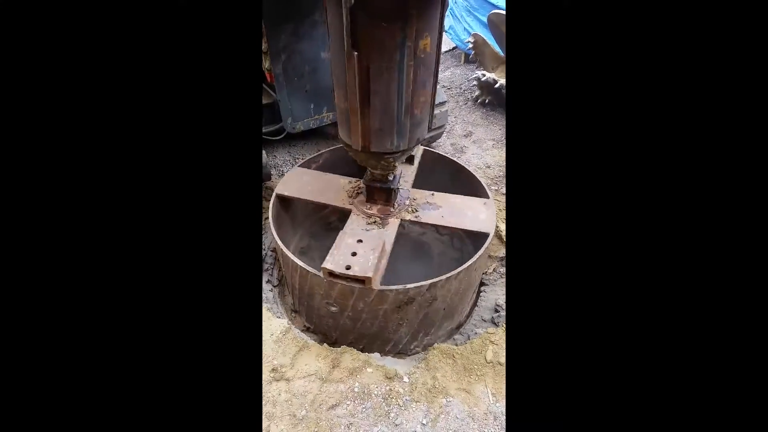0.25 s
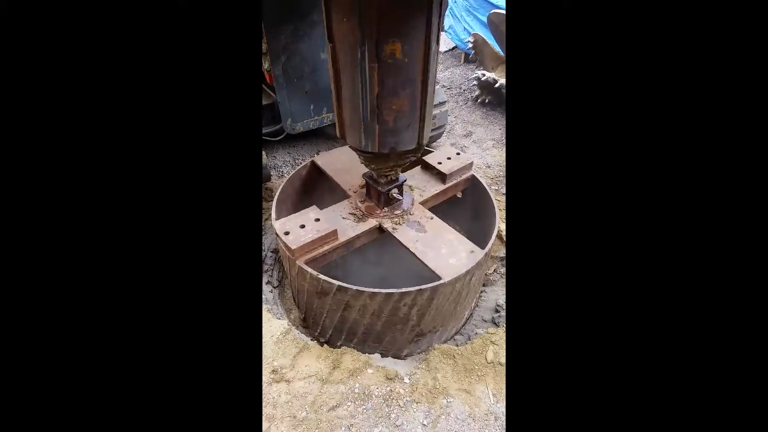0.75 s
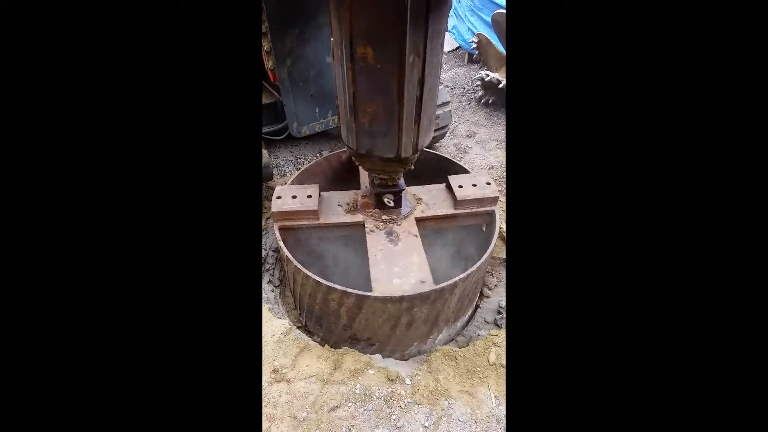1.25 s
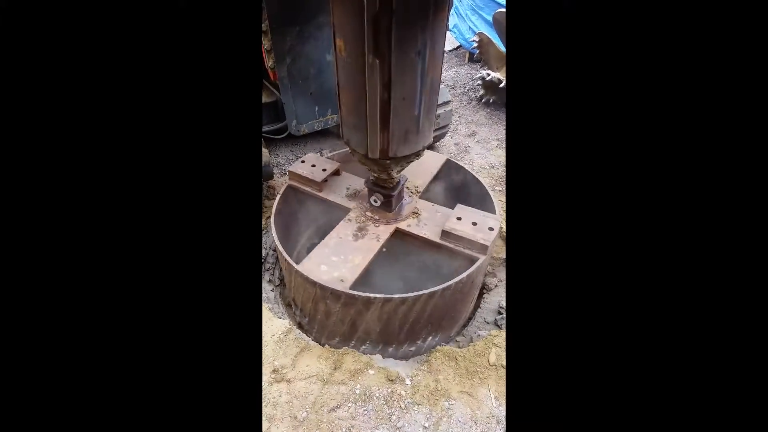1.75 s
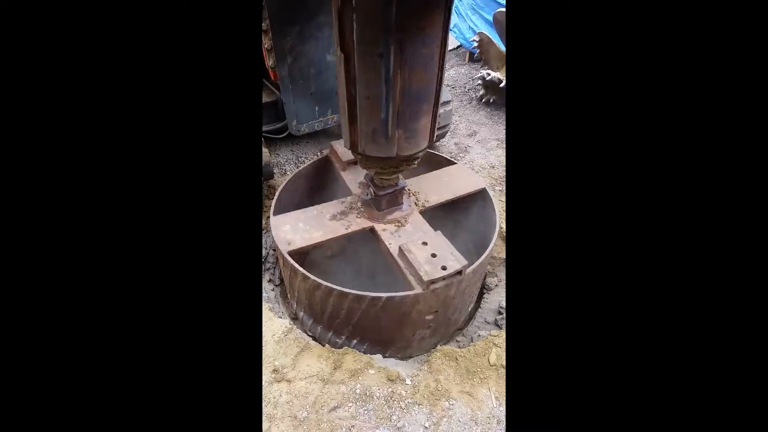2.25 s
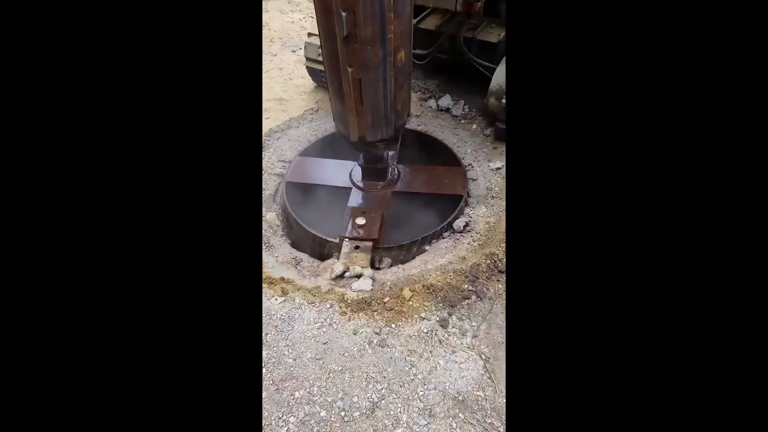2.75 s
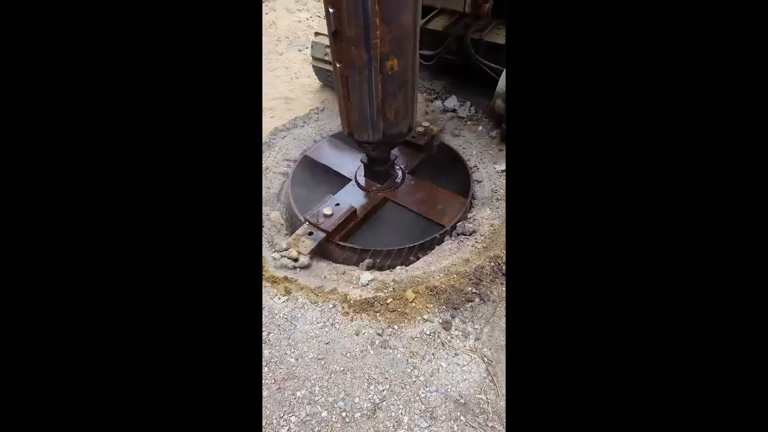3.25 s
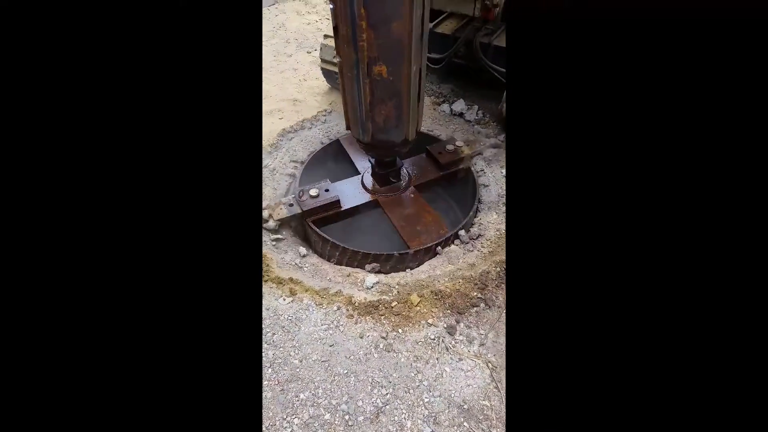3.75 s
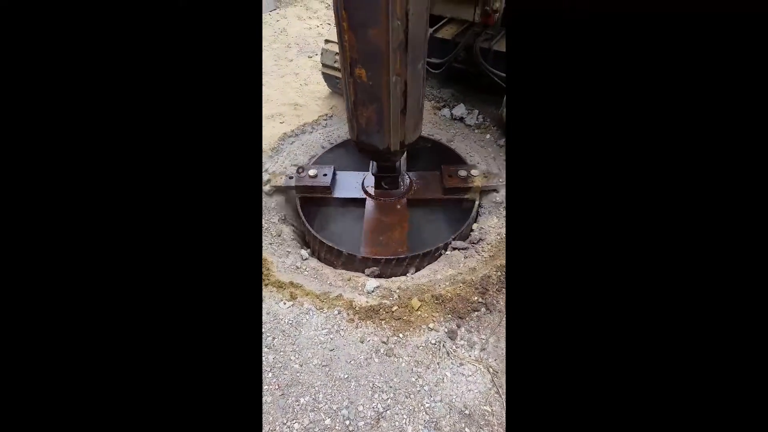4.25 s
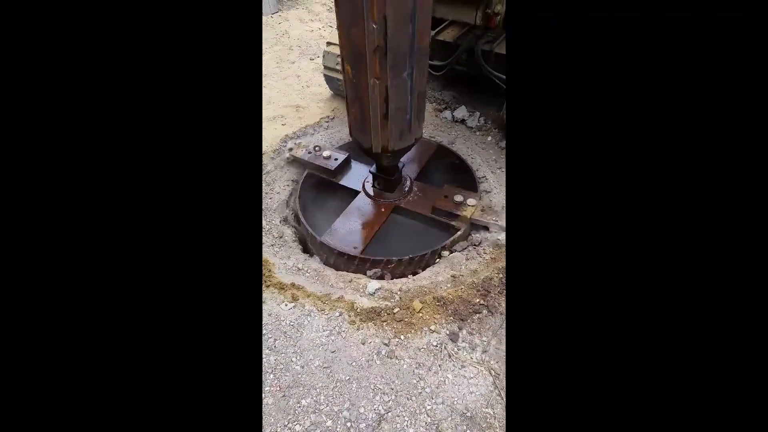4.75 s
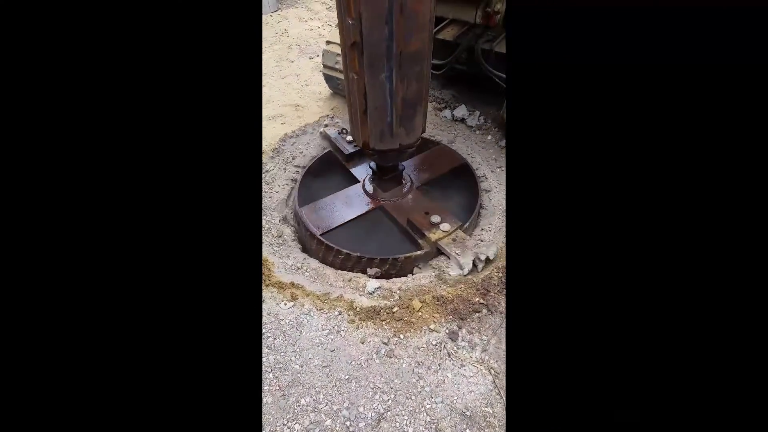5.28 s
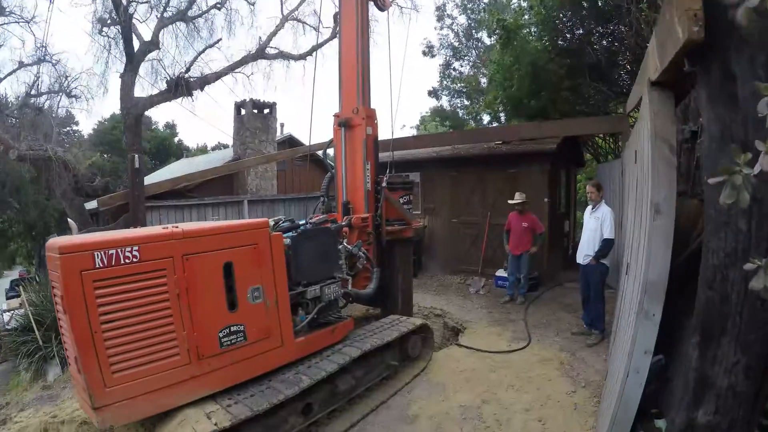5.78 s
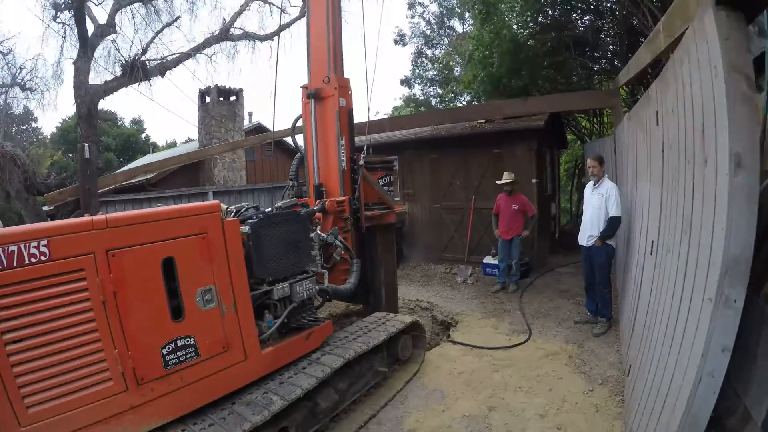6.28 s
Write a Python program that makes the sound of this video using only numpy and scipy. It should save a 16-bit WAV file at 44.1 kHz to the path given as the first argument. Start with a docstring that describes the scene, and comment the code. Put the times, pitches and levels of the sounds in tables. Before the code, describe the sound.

From 0 to 2.5 seconds, a close, loud, continuous grinding of steel teeth on rock: low rumble, gravelly crunch, bright scrape and fine sizzling grit. A diesel throbs near fifty pulses a second, sagging around 1.3 and 2.3, with a wavering drive hum. Hard spots surge, notably near 0.95, 1.25 and 1.67, with squeaks and thin squeals. A dry click marks the cut at 2.5. Until 5.4 the engine is slower and the barrel drags, catching in irregular booming bites and short groans, strong around 2.8, 3.6 and 4.1, sparser after 4.5, renewed at 5.2. Chips snap between them. Another click and a tiny gap precede 5.5, when a far quieter, steady diesel clatters and rattles beside the rig. Light knocks come near 5.8 and 6.25, a sharp double tick at 6.34, and low breeze rumble rises from 6.1 until the end at 6.5.

```python
"""Steel teeth of a core barrel cut hard rock: trains of tiny fractures, filtered by the barrel's modes.
A diesel engine drives the rig: sine orders of its firing rate. Three stretches follow one another.
First the teeth grind while the engine labours; then it runs slower and the teeth catch and break through
in single bites that boom in the barrel; last, beside the rig, the engine clatters in a breeze."""
import sys
import numpy as np
from scipy import signal
from scipy.fft import rfft, irfft
from scipy.io import wavfile
from scipy.ndimage import uniform_filter1d

SR = 44100
rng = np.random.default_rng(int(sys.argv[2]) if len(sys.argv) > 2 else 0)


def file_out(sig):
    """Save sig as 16-bit WAV at sys.argv[1]."""
    # one column per channel
    cols = np.atleast_2d(sig).T
    # limit, then scale
    lim = np.clip(cols, -1, 1)
    pcm = np.round(lim * 32767).astype(np.int16)
    wavfile.write(sys.argv[1], SR, pcm)


N = 287616
T, HZ = np.arange(N) / SR, np.fft.rfftfreq(N, 1 / SR)
# the three stretches: (start t/s, end t/s)
GRINDING, BITING, BESIDE = (0, 2.494), (2.494, 5.438), (5.482, 6.53)


def amp(db):
    """Level definition: amplitude ratio of a level in dB."""
    return 10 ** (np.asarray(db) / 20)


def unit(x):
    """Normalisation: the mean of the channels gets rms 1."""
    return x / np.sqrt(np.mean(np.atleast_2d(x).mean(0) ** 2) + 1e-20)


def read(points):
    """Logarithmic frequency scale: joins a table over frequency by straight lines."""
    hz, value = np.transpose(points)
    return np.interp(np.log(HZ + 1), np.log(hz + 1), value)


def curves(rows):
    """Piecewise-linear envelopes: one curve for each column of a table over time."""
    s, *columns = np.transpose(rows)
    return [np.interp(T, s, c) for c in columns]


def during(span):
    """Gating: 1 within a stretch, 0 outside, with short ramps."""
    return uniform_filter1d(1. * ((T >= span[0]) & (T < span[1])), size=64)


def drift(hz):
    """Low-pass random modulation of rms 1, up to about hz."""
    steps = uniform_filter1d(rng.standard_normal(20000), size=4)
    return unit(np.interp(T * hz * 8, np.arange(len(steps)), steps))


def add(mix, s, sound):
    """Superposition: adds a sound into a mix at time s."""
    part = mix[round(s * SR):][:len(sound)]
    part += sound[:len(part)]


def tint(x, tone):
    """Linear filtering: colours a sound with a spectrum, then normalises it."""
    return unit(irfft(rfft(x) * amp(read(tone)), N))


def resonance(hz, width):
    """Damped-oscillator response of one mode, gain 1 at its peak."""
    return 1 / (1 + 1j * (HZ ** 2 - hz ** 2) / (width * HZ + 1e-9))


def whistle(hz, width):
    """Narrow-band noise: white noise passed twice through one resonance."""
    noise = rfft(rng.standard_normal(N))
    return unit(irfft(noise * resonance(hz, width) ** 2, N))


def fractures(per_s, spread_db):
    """Impulse process: two random trains of tiny breaks whose levels spread exponentially."""
    out, count = np.zeros((2, N)), int(per_s * N / SR)
    draws = np.random.default_rng(rng.integers(2 ** 31)).random((count, 3, 2))
    for train, (place, size, sign) in zip(out, draws.T):
        level_db = spread_db * np.minimum(-np.log(size), 4)
        train[(place * N).astype(int)] = np.sign(sign - .5) * amp(level_db)
    return out


def burst(length, rise, t60):
    """Transient envelope of one break: exponential rise, a hold while the rock gives way, ring-out."""
    t = T[:SR // 2]
    return (1 - np.exp(-t / rise)) * amp(-60 * np.maximum(t - length, 0) / t60)


def bursts(events, rise, t60):
    """Power summation of overlapping breaks (t/s, length/s, level/dB); one rise for all, or one each."""
    power, events = np.zeros(N), list(events)
    for (s, length, db), own_rise in zip(events, rise * np.ones(len(events))):
        add(power, s, (amp(db) * burst(length, own_rise, t60)) ** 2)
    return np.sqrt(power)


# likeness of the two microphone ports: (f/Hz, likeness 0-1)
PORT_LIKENESS = [(60, 1), (150, .98), (300, .87), (600, .5), (2000, .5), (5000, .4), (12000, .15)]
# phase by which the left port leads: (f/Hz, phase/rad)
LEFT_LEAD = [(20, 0), (1950, 0), (2760, .7), (3600, 3.1), (6200, 6), (13000, 6.8)]
# left-minus-right balance, used by the layers of steady cutting and of biting: (f/Hz, level difference/dB)
CUT_BALANCE = [(60, 7), (250, -9.5), (700, -2), (2400, -10.5), (4400, 0.5), (8000, 17), (11000, -13)]
BITE_BALANCE = [(60, 6), (250, -7), (700, -3.5), (2400, -6.5), (4400, 1), (8000, 9.5), (11000, -4.5)]


def pair(x, colour, balance):
    """Partial coherence: blends two unrelated sounds into the left and right microphone ports."""
    a, b = rfft(x) * colour
    same, lean = np.clip(read(PORT_LIKENESS), 0, 1), amp(read(balance) / 2)
    right = (same * a + np.sqrt(1 - same ** 2) * b) * np.exp(-1j * read(LEFT_LEAD))
    return unit(irfft(np.array([a * lean, right / lean]), N))


# breeze on the microphone: (t/s, level/dB before breeze_db)
BREEZE = [(5.5, -47), (5.95, -46), (6.08, -43), (6.14, -38.5), (6.36, -37.5), (6.5, -43.5)]
# spectrum of the breeze: (f/Hz, gain/dB)
BREEZE_TONE = [(12, 0.5), (28, 1.5), (50, -3), (100, -14.5), (180, -24), (300, -35), (600, -57)]


def breeze(breeze_db=3):
    """Turbulence noise: the breeze rumbles as low-pass filtered noise."""
    return amp(curves(BREEZE)[0] + breeze_db) * tint(rng.standard_normal(N), BREEZE_TONE)


# spectrum of the clicks: (f/Hz, gain/dB)
CLICK_TONE = [(300, -12), (1200, -1), (3000, 1), (7000, -5), (14000, -12)]
# sharp clicks: (t/s, level/dB before colouring, t60/s)
CLICKS = [(2.4915, -16, .011), (5.433, -29, .012), (5.824, -43, .008), (6.259, -38, .01),
          (6.3438, -29, .004)]


def clicks():
    """Impulsive noise: dry broadband snaps, over in a few milliseconds."""
    out, t = np.zeros(N), T[:SR // 20]
    for s, db, t60 in CLICKS:
        add(out, s, amp(db - 60 * t / t60) * rng.standard_normal(len(t)))
    return irfft(rfft(out) * amp(read(CLICK_TONE)), N)


# light knocks and a sharp double tick beside the rig: (t/s, f/Hz, width/Hz, level/dB)
KNOCKS = [(5.824, 690, 170, -31), (5.959, 680, 170, -36), (6.098, 260, 150, -34), (6.259, 720, 190, -26),
          (6.3439, 2900, 900, -18), (6.3451, 2350, 450, -27)]


def knocks():
    """Free damped vibration: loose parts knock, and a wider mode dies faster."""
    out, t = np.zeros(N), T[:SR // 10]
    for s, hz, width, db in KNOCKS:
        add(out, s, amp(db) * np.exp(-np.pi * width * t) * np.sin(2 * np.pi * hz * t))
    return out


IDLE_HZ = 39.212  # firing rate heard from beside the rig
# rise of a ping (s), width of its ring (Hz), spread in time (cycles) and in strength (dB)
PING_RISE_S, PING_WIDTH_HZ, PING_JITTER, PING_SPREAD_DB = .0005, 250, .06, 3
# loose engine parts: (place in the firing cycle 0-1, f/Hz, level/dB, t60/s)
PINGS = [(.0, 2750, -37, .03), (.07, 3000, -42, .025), (.73, 2550, -43, .02)]


def rattle():
    """Periodic impact excitation: loose parts buzz at set places in the firing cycle, early or late."""
    out, t = np.zeros(N), T[:SR // 20]
    cycles = np.arange(np.floor(BESIDE[0] * IDLE_HZ), T[-1] * IDLE_HZ)
    for place, hz, db, t60 in PINGS:
        strength = np.zeros(N)
        for cycle, (late, size) in zip(cycles, rng.uniform(-1.75, 1, (len(cycles), 2))):
            level_db = db + PING_SPREAD_DB * size - 60 * t / t60
            blow = (1 - np.exp(-t / PING_RISE_S)) * amp(level_db)
            add(strength, (cycle + place + PING_JITTER * late) / IDLE_HZ, blow)
        out += strength * whistle(hz, PING_WIDTH_HZ)
    return out


# jump of the clatter at each firing (ratio), its unevenness (dB), its decay (cycles)
JUMP, UNEVEN_DB, DECAY_CYCLES = 1.7, 2, .27
# a second, lighter tick in each cycle: its place (cycles), width (cycles), jump (ratio)
TICK_AT, TICK_WIDTH, TICK_JUMP = .76, .06, .7
# the clatter swells once: centre (s), width (s), height (dB)
SWELL_S, SWELL_WIDTH_S, SWELL_DB = 6.24, .05, 2
# spectrum of the clatter: (f/Hz, gain/dB)
CLATTER_TONE = [(160, -45), (280, -7.5), (359, -23), (391, -3.5), (432, -16.5), (761, -15), (993, -15.5),
                (1150, -10), (1300, -14), (1660, -5.5), (2030, -5.5), (2570, -5), (3830, -13.5),
                (10200, -32), (15000, -53)]


def clatter(clatter_db=-47.0):
    """Amplitude modulation: small ticks jump at each firing, never twice alike, and die early in the cycle."""
    cycle = IDLE_HZ * T % 1
    tick = TICK_JUMP * np.exp(-((cycle - TICK_AT) / TICK_WIDTH) ** 2)
    jump = JUMP * amp(UNEVEN_DB * drift(21)) * np.exp(-cycle / DECAY_CYCLES)
    firing = unit(1 + tick + jump)
    swell_db = SWELL_DB * np.exp(-((T - SWELL_S) / SWELL_WIDTH_S) ** 2)
    ticks = fractures(per_s=6800, spread_db=2.5)[0]
    return amp(clatter_db + swell_db) * tint(firing * ticks, CLATTER_TONE)


# ringing of the engine block: (f/Hz, width/Hz of one resonance pass, level/dB)
BLOCK = [(1515, 10, -64), (1700, 27, -59), (2450, 60, -61), (2600, 70, -58), (2940, 33, -63)]


def block_ring():
    """Modal resonance: steady noise rings in the modes of the engine block."""
    return sum(amp(db) * whistle(hz, width) for hz, width, db in BLOCK)


def engine(hz, orders, waver, wobble):
    """Order synthesis: exhaust lines on the firing rate; uneven firing shakes the upper ones most."""
    turns = np.cumsum(hz * np.ones(N)) / SR + wobble * drift(13)
    out = np.zeros(N)
    for k, db in orders:
        strength = amp(db) * (1 + waver * min(k / 3, 1) * drift(12))
        out += strength * np.cos(2 * np.pi * (k * turns + rng.random()))
    return np.sqrt(2) * out


# exhaust lines beside the rig: (multiple of the firing rate, level/dB)
IDLE_ORDERS = [(1, -40.5), (2, -54), (3, -56), (4, -64), (5, -58), (10, -68)]


def beside():
    """Superposition beside the rig: exhaust, clatter, block and loose parts, breeze and knocks."""
    exhaust = engine(IDLE_HZ, IDLE_ORDERS, waver=.3, wobble=.006)
    return exhaust + clatter() + block_ring() + rattle() + breeze() + knocks()


# strength of the slow engine: (t/s, level/dB before a layer's own gain)
SLOW = [(2.55, -22), (2.67, -23.5), (4.04, -24), (4.18, -33.5), (4.24, -30), (4.9, -31.5), (5.41, -21.5)]
# its exhaust lines: (multiple of the firing rate, relative level/dB)
SLOW_ORDERS = [(1, 0.5), (2, -8.5), (3, -6), (4, -6), (5, -2), (6, -5.5), (7, -8.5)]


def slow_exhaust(firing_hz=38.58, exhaust_db=-3):
    """Harmonic series: the slow engine's lines at whole multiples of a steady firing rate."""
    lines = engine(firing_hz, SLOW_ORDERS, waver=0.47, wobble=0.041)
    return amp(curves(SLOW)[0] + exhaust_db) * lines * amp([[-1.2], [1.1]])  # left, right


# the throb swells as the engine lugs below its free rate (dB per Hz of sag)
FREE_HZ, LUG_DB_PER_HZ = 51.4, 2
WHINE_DB_PER_S = 3.3  # the whine grows as the teeth bed in
# labouring engine: (t/s, firing rate f/Hz)
LOADED = [(0, 49.8), (.2, 49.3), (.35, 50.3), (.6, 50.6), (.85, 52.3), (1.14, 51.8), (1.27, 46.3),
          (1.62, 46.4), (1.85, 48.8), (2.05, 50.1), (2.26, 50), (2.33, 46.2), (2.41, 46.8), (2.49, 49)]
# its exhaust lines: (multiple of the firing rate, level/dB)
LOADED_ORDERS = [(1, -20.3), (2.75, -29), (3, -34), (4.5, -30), (5.25, -35), (7.4, -32), (8.3, -41),
                 (10.5, -43)]
# lines that swell as it lugs: (multiple of the firing rate, level/dB at the free rate)
LUG_ORDERS = [(2, -33), (3, -35)]
# its whine: (multiple of the firing rate, level/dB at t = 0)
WHINE_ORDERS = [(2.8, -35), (6.4, -39), (10, -43), (12, -49)]


def labouring_exhaust():
    """Load-dependent excitation: the exhaust throbs harder when the rock drags the speed down."""
    hz = curves(LOADED)[0]
    lines = engine(hz, LOADED_ORDERS, waver=.17, wobble=.003)
    throb = engine(hz, LUG_ORDERS, waver=.25, wobble=.004)
    whine = engine(hz, WHINE_ORDERS, waver=.35, wobble=.002)
    return lines + amp(LUG_DB_PER_HZ * (FREE_HZ - hz)) * throb + amp(WHINE_DB_PER_S * T) * whine


HUM_WAVER_HZ, HUM_WAVER_DB = 1.2, 1.4
# hum of the rotary drive: (t/s, f/Hz, level/dB before the partial's own)
HUM = [(0, 246, -22), (.24, 245, -21), (.29, 257, -17.5), (.4, 250, -20), (.55, 250, -17.5),
       (.78, 252, -19), (.86, 263, -18.5), (.97, 260, -24), (1.06, 256, -20), (1.19, 257, -18.5),
       (1.26, 234, -22), (1.46, 230, -19), (1.53, 232, -30), (1.62, 235, -18), (1.75, 238, -26),
       (1.91, 226, -19), (1.97, 249, -20), (2.27, 249, -17.5), (2.33, 224, -19), (2.48, 224, -16.5)]
# its partials: (multiple of the hum, relative level/dB)
HUM_PARTIALS = [(.9, -11), (1, .5), (1.24, -13)]


def drive_hum():
    """Inharmonic partials: the rotary drive hums, each partial wavering by itself in pitch and strength."""
    hz, db = curves(HUM)
    out = np.zeros(N)
    for ratio, partial_db in HUM_PARTIALS:
        pitch = ratio * hz + HUM_WAVER_HZ * drift(14)
        strength = amp(db + partial_db + HUM_WAVER_DB * drift(12))
        out += strength * np.sin(2 * np.pi * np.cumsum(pitch) / SR)
    return out


# ringing of the steel barrel: (f/Hz, width/Hz, level/dB above its flat bed)
BARREL = [(140, 25, 4), (235, 30, 3), (290, 20, 3), (365, 20, 7), (437, 24, 6), (533, 27, 2), (605, 22, 3),
          (745, 27, 5), (845, 18, 7), (1298, 45, 5), (1803, 18, 9.5), (2020, 32, 6), (2143, 35, 3),
          (2257, 38, 4), (2470, 32, 4), (2700, 35, 3), (2880, 30, 3), (3225, 27, 4), (3570, 45, 5)]


def barrel():
    """Modal superposition: frequency response of the barrel, its modes standing out of a flat bed."""
    return 1 + sum((amp(db) - 1) * resonance(hz, width) for hz, width, db in BARREL)


def stall_dip(stall_s=.05, stall_db=-3.5):
    """Gain modulation: the stalling barrel dips from stall_s before each bite to just after its start."""
    stall = np.zeros(N)
    for s, *_ in BITES:
        add(stall, s - stall_s, np.hanning(round(stall_s * SR * 1.4)))
    return amp(stall_db * np.minimum(stall, 1))


# dragging between bites: (t/s, rumble level/dB, crunch level/dB), before the layer gain and the dips
DRAG = [(2.52, -18, -33.5), (2.75, -22, -31.5), (3.35, -31, -37.5), (3.79, -17.5, -34), (4.24, -23.5, -32),
        (4.83, -31.5, -43.5), (5.16, -33, -43)]
# spectrum of the dragging rumble: (f/Hz, gain/dB)
DRAG_RUMBLE = [(20, -36.5), (60, -9.5), (100, -0.5), (150, 5.5), (220, 3), (300, 4.5), (380, 6),
               (480, -13.5), (750, -70.5)]
# spectrum of the dragging crunch: (f/Hz, gain/dB)
DRAG_CRUNCH = [(300, -14.5), (500, 10.5), (700, 3.5), (1000, -5.5), (1600, -11.5), (2600, -15.5),
               (3500, -21), (5000, -34), (9000, -94.5)]


def dragging(steel, rumble_db=-1, lumpy_db=2.5):
    """Friction noise: the barrel drags over loose cuttings, whose tiny breaks excite the steel."""
    rumbling, crunching = amp(curves(DRAG))
    rumble_breaks = fractures(per_s=820, spread_db=3.0)
    crunch_breaks = fractures(per_s=2800, spread_db=0.0)
    lumps = amp(rumble_db + lumpy_db * drift(7.4))
    rumble = lumps * rumbling * pair(rumble_breaks, steel * amp(read(DRAG_RUMBLE)), BITE_BALANCE)
    crunch = crunching * pair(crunch_breaks, steel * amp(read(DRAG_CRUNCH)), BITE_BALANCE)
    return (rumble + crunch) * stall_dip()


# steady crunch and scrape (dB at t = 0), and their growth as the teeth bed in
CRUNCH_DB, SCRAPE_DB, BEDDING_DB_PER_S = -32, -39.5, 1.64
SCRAPE_RISE_S, SCRAPE_T60_S = 0.0074, 0.25
# teeth scraping over hard spots: (t/s, length/s, crunch level/dB, scrape level/dB)
SCRAPES = [(0.039, 0.013, -26.5, -30), (0.098, 0.11, -29, -37.5), (0.252, 0.067, -47, -35.5),
           (0.354, .11, -31, -35), (0.83, 0.11, -27.5, -34), (0.937, 0.052, -18.5, -25),
           (1.096, 0.026, -55, -36.5), (1.249, 0.058, -23.5, -27.5), (1.353, 0.16, -43, -37),
           (1.507, 0.032, -27.5, -29.5), (1.653, 0.062, -21, -31), (1.728, 0.14, -29, -38.5),
           (1.872, 0.098, -25.5, -34.5), (2.311, 0.063, -26, -30.5)]


def cutting():
    """Power summation: strength of crunch and scrape, a steady bed with a surge at every hard spot."""
    bed = amp(BEDDING_DB_PER_S * T)
    crunch = bursts([(s, length, db) for s, length, db, _ in SCRAPES], SCRAPE_RISE_S, SCRAPE_T60_S)
    scrape = bursts([(s, length, db) for s, length, _, db in SCRAPES], SCRAPE_RISE_S, SCRAPE_T60_S)
    return np.hypot(amp(CRUNCH_DB) * bed, crunch), np.hypot(amp(SCRAPE_DB) * bed, scrape)


# steel rubbing in thin squeals: (t/s, length/s, relative level/dB)
SQUEALS = [(0.0, 0.11, -7), (0.254, 0.096, -4), (1.095, 0.047, -0.5), (1.233, 0.065, -1),
           (1.387, 0.05, 6.5), (1.495, 0.044, -7), (1.608, 0.062, 4.5), (1.96, 0.036, -13),
           (2.15, 0.05, -10)]


def rubbing():
    """Smooth gating: strength of the squeal, each rub swelling and fading in one arch."""
    out = np.zeros(N)
    for s, length, db in SQUEALS:
        add(out, s, amp(db) * np.sqrt(np.hanning(round(length * SR))))
    return out


# modes of the squeal: (f/Hz, width/Hz of one resonance pass, level/dB before the rub's own)
SQUEAL_MODES = [(3580, 45, -53), (8100, 40, -56), (12792, 25, -47)]


def squeal():
    """Friction-excited resonance: rubbing steel sings in a few narrow modes."""
    return rubbing() * sum(amp(db) * whistle(hz, width) for hz, width, db in SQUEAL_MODES)


SIZZLE_DB = -44  # fine grit under steady cutting, before it follows the scrape
# spectrum of the sizzle: (f/Hz, gain/dB)
SIZZLE_TONE = [(6000, -59.5), (8900, -41.5), (10000, -10), (11500, -7.5), (13000, -2), (14500, -7),
               (16000, -8)]
# further filter on the sizzle during the biting stretch: (f/Hz, gain/dB)
THINNING = [(9000, -9.5), (12000, -3), (13500, 3), (14500, 8.5)]
# spectrum of a snapping chip: (f/Hz, gain/dB)
CHIP_TONE = [(1500, -25), (4000, 0), (8000, -30), (11000, -4), (14500, 5.5)]
# chips snapping off, each with a spray of grit: (t/s, snap level/dB before chip_db, spray level/dB)
CHIPS = [(0.385, -30, -31.5), (0.836, -38, -42), (1.008, -38, -31.5), (1.688, -19, -40),
         (2.684, -18.5, -41), (2.924, -24, -44), (3.23, -30, -47), (3.6316, -35, -43), (3.949, -30, -45.5),
         (3.99, -27, -53), (4.092, -27, -42.5), (4.337, -33, -48), (4.8843, -45, -64)]


def grit(chip_db=-4, chip_t60=0.015, follow=0.52, rub_db=-41, drag_db=-28, spray_s=0.011, spray_t60=0.15):
    """Dense micro-fracture noise: grit sizzles with the teeth's work; now and then a chip snaps and sprays."""
    grains = fractures(per_s=3500, spread_db=-3.0)
    sizzle = amp(1.1 * drift(50)) * pair(grains, amp(read(SIZZLE_TONE)), CUT_BALANCE)
    # while the barrel drags and bites, the sizzle is thinner and higher, and follows the engine's effort
    thin = irfft(rfft(sizzle) * amp(read(THINNING)), N)
    effort = (cutting()[1] / amp(SCRAPE_DB)) ** follow
    ground = np.hypot(amp(SIZZLE_DB) * effort, amp(rub_db) * rubbing())
    dragged = amp(curves(SLOW)[0] + drag_db)
    spray = bursts([(s, spray_s, db) for s, _, db in CHIPS], rise=0.0016, t60=spray_t60)
    snaps = bursts([(s, .0013, db + chip_db) for s, db, _ in CHIPS], rise=0.00063, t60=chip_t60)
    splinters = fractures(per_s=12000, spread_db=-5.0)
    chips = snaps * pair(splinters, amp(read(CHIP_TONE)), CUT_BALANCE)
    grinding_grit = sizzle * np.hypot(ground, spray) * during(GRINDING)
    biting_grit = thin * np.hypot(dragged, spray) * during(BITING)
    return grinding_grit + biting_grit + chips


# grains: number, range of pitch (Hz), ring (cycles), top level against the scrape (dB), spread below it (dB)
GRAVEL_COUNT, GRAVEL_HZ, GRAVEL_CYCLES, GRAVEL_DB, GRAVEL_SPREAD_DB = 420, (750, 2400), 7, 8, 12


def gravel():
    """Granular synthesis: coarse grains burst under the teeth, each with a short damped ring of its own."""
    out, t = np.zeros((2, N)), T[:SR // 20]
    for when, pitch, size, side in rng.random((GRAVEL_COUNT, 4)):
        hz = GRAVEL_HZ[0] * (GRAVEL_HZ[1] / GRAVEL_HZ[0]) ** pitch
        envelope = np.exp(-hz * t / GRAVEL_CYCLES) * np.minimum(hz * t, 1)
        grain = amp(GRAVEL_DB - GRAVEL_SPREAD_DB * size) * envelope * np.sin(2 * np.pi * hz * t)
        for port, share in zip(out, (1 - side, 1 + side)):  # each grain leans to the right
            add(port, GRINDING[1] * when, share * grain)
    return out * cutting()[1] * during(GRINDING)


# skids: number, range of pitch (Hz) and length (s), largest slide (share of the pitch)
RASP_COUNT, RASP_HZ, RASP_S, RASP_SLIDE = 90, (900, 2200), (.015, .045), .06
# top level against the scrape before the left-right lean, and the spread below it
RASP_DB, RASP_SPREAD_DB = 2, 10


def rasps():
    """Frequency-swept tones: single teeth skid in short, sliding chirps, louder at the hard spots."""
    out, scraping = np.zeros(N), cutting()[1]
    for when, pitch, span, slide, size in rng.random((RASP_COUNT, 5)):
        swell = np.hanning(round(np.interp(span, (0, 1), RASP_S) * SR))
        sweep = 1 + RASP_SLIDE * (slide - .5) * np.linspace(-1, 1, len(swell))
        hz = np.interp(pitch, (0, 1), RASP_HZ) * sweep
        chirp = swell * np.sin(2 * np.pi * np.cumsum(hz) / SR)
        add(out, GRINDING[1] * when, amp(RASP_DB - RASP_SPREAD_DB * size) * chirp)
    return out * scraping * during(GRINDING) * amp([[-3], [2]])  # left, right


SQUEAK_SKEW = .7  # under 1, a squeak peaks early in its length
# steel squeaking on stone: (t/s, f/Hz, level/dB before flutter and lean, length/s, pitch waver/Hz)
SQUEAKS = [(.052, 2300, -23, .05, 150), (.12, 2100, -31, .04, 150), (.29, 2550, -37, .03, 30),
           (.37, 1600, -30, .04, 90), (.41, 1290, -28, .04, 25), (.45, 1810, -29, .05, 20),
           (.94, 2050, -25, .06, 200), (1.0, 1795, -25, .035, 10), (1.10, 2780, -45, .09, 15),
           (1.265, 1800, -23, .05, 60), (1.515, 1950, -30, .05, 110), (1.675, 720, -21, .06, 50),
           (1.685, 1900, -29, .1, 60), (1.89, 1803, -29, .16, 10), (2.31, 2200, -26, .05, 150),
           (2.32, 1297, -31, .09, 12), (2.36, 2019, -32, .07, 25), (2.803, 925, -20, .05, 12),
           (2.805, 1803, -24, .08, 14), (2.96, 2600, -43, .13, 0), (3.525, 5850, -60, .05, 120),
           (3.585, 1950, -28, .03, 120), (3.63, 1310, -29, .06, 10), (3.66, 1803, -30, .04, 10),
           (4.288, 2500, -33, .03, 120), (4.49, 1880, -35, .03, 50)]


def squeaks():
    """Friction-driven oscillation: a sliding tooth sings, cleanly if it slips evenly, else in a screech."""
    out, waver = np.zeros(N), drift(350)
    for s, hz, db, length, waver_hz in SQUEAKS:
        age = np.linspace(0, 1, round(length * SR))
        swell = np.sin(np.pi * age ** SQUEAK_SKEW)
        slip = waver[round(s * SR):][:len(age)]
        pitch = hz + waver_hz * (slip + .5 - age)  # the more it wavers, the further it sags
        add(out, s, amp(db) * swell * np.sin(2 * np.pi * np.cumsum(pitch) / SR))
    flutter = 1 + .35 * drift(120)
    return out * flutter * amp([[-2], [2]])  # left, right


# spectrum of the cutting rumble: (f/Hz, gain/dB)
CUT_RUMBLE = [(20, -30), (65, 6), (105, 9), (170, 8.5), (215, 7.5), (280, 6), (380, 3.5), (470, -22.5),
              (700, -86.5)]
# spectrum of the cutting crunch: (f/Hz, gain/dB)
CUT_CRUNCH = [(300, -6.5), (480, 2.5), (700, 1), (950, -5), (1300, -9), (1700, -28), (3000, -75)]
# spectrum of the cutting scrape: (f/Hz, gain/dB)
CUT_SCRAPE = [(900, -5), (1500, 3), (2000, 3.5), (2500, -4.5), (3200, -4), (4200, -9), (6200, -25),
              (7800, -48), (12000, -83.5)]


def grinding(steel, rumble_db=-21.0, surge=0.17, judder_db=1.4):
    """Source-filter principle: all teeth cut at once; breaks rumble, crunch and scrape through the barrel."""
    crunching, scraping = cutting()
    load = (crunching / amp(CRUNCH_DB)) ** surge  # harder cutting shakes the barrel more
    coarse = fractures(per_s=800, spread_db=-1.5)
    medium = fractures(per_s=1500, spread_db=2.5)
    fine = fractures(per_s=2500, spread_db=-3.0)
    rumble = amp(rumble_db) * load * pair(coarse, steel * amp(read(CUT_RUMBLE)), CUT_BALANCE)
    crunch = crunching * pair(medium, steel * amp(read(CUT_CRUNCH)), CUT_BALANCE)
    judder = amp(judder_db * drift(45))
    scrape = scraping * judder * pair(fine, steel * amp(read(CUT_SCRAPE)), CUT_BALANCE)
    return rumble + crunch + scrape


GROAN_RISE_S, GROAN_T60_S, SLIP_HZ = .003, .15, 6
# the barrel groaning on a caught tooth: (t/s, length/s, f/Hz, level/dB before the lean)
GROANS = [(2.548, .035, 363, -14), (2.548, .014, 735, -19), (2.55, .015, 620, -24), (2.66, .015, 610, -24),
          (2.669, .05, 363, -12), (2.672, .05, 439, -15), (2.685, .02, 285, -17), (2.775, .045, 356, -18),
          (2.803, .05, 840, -22), (2.915, .017, 610, -20), (2.92, .04, 428, -15), (2.94, .04, 358, -10.5),
          (2.94, .025, 291, -14), (2.98, .07, 435, -22), (3.12, .025, 360, -19), (3.239, .03, 435, -20),
          (3.255, .075, 215, -18), (3.275, .025, 285, -19), (3.28, .08, 746, -30), (3.524, .03, 355, -14.5),
          (3.525, .025, 215, -12), (3.581, .022, 355, -9), (3.585, .025, 600, -23), (3.6, .03, 428, -21),
          (3.635, .055, 339, -17), (3.635, .02, 850, -25), (3.665, .025, 1020, -28),
          (3.752, .018, 150, -12), (3.765, .03, 353, -17), (3.765, .05, 705, -25),
          (3.775, .045, 234, -10.5), (3.78, .02, 616, -23), (3.805, .025, 423, -18), (3.949, .04, 369, -15),
          (3.95, .04, 444, -22), (4.045, .045, 358, -14), (4.104, .028, 363, -7), (4.11, .12, 740, -27),
          (4.15, .042, 444, -10), (4.15, .09, 374, -17), (4.22, .2, 151, -25), (4.288, .022, 748, -15),
          (4.29, .02, 640, -22), (4.29, .03, 371, -17), (4.325, .025, 441, -16), (4.5, .025, 350, -18),
          (4.505, .05, 711, -27), (4.685, .025, 571, -31), (5.176, .03, 326, -20), (5.176, .03, 608, -28),
          (5.18, .03, 199, -21)]


def groans():
    """Stick-slip excitation: a caught tooth sets a barrel mode groaning; uneven slipping bends the pitch."""
    out = np.zeros(N)
    for s, length, hz, db in GROANS:
        strength = amp(db) * burst(length, GROAN_RISE_S, GROAN_T60_S)
        pitch = hz + SLIP_HZ * drift(40)[:len(strength)]
        add(out, s, strength * np.sin(2 * np.pi * (np.cumsum(pitch) / SR + rng.random())))
    return out


HARD_RISE_S = .002  # a bite that rises this fast or faster gives a full strike


def strikes(again_db=-15.5):
    """Impulse excitation: a tooth hits, softly if it digs in slowly, then slips and hits again twice."""
    out = np.zeros(N)
    for (s, length, rise, _, crunch_db, *_), slips in zip(BITES, rng.random(size=(len(BITES), 2))):
        add(out, s, amp([crunch_db]) * min(HARD_RISE_S / rise, 1))
        for share in slips:
            add(out, s + share * length, amp([crunch_db + again_db]))
    return out


def causal(tone):
    """Minimum phase: response of a spectrum that rings only after the blow, never before it."""
    log_gain = np.log(amp(read(tone)))
    return np.exp(rfft(irfft(log_gain, N) * (1 + np.sign(np.fft.fftfreq(N)))))


# extra rise of a bite's boom, judder of its breaks
BOOM_LAG_S, JUDDER_DB = .002, 2.2
# ring-out of a bite's boom and crunch, and of its crack and bright edge
BITE_T60_S, CRACK_T60_S = 0.22, 0.29
# spectra of the boom, crunch, crack and bright edge, from low to high: each (f/Hz, gain/dB)
BITE_BOOM = [(70, -26), (140, -8.5), (220, 3), (330, 10.5), (440, 5), (540, -33), (800, -77)]
BITE_CRUNCH = [(330, -66), (560, 11), (750, 5.5), (1000, -7.5), (1300, -6.5), (1700, -32), (3000, -101.5)]
BITE_CRACK = [(600, -24.5), (900, 15.5), (1400, 4.5), (2000, -0.5), (2500, -18.5), (3500, -31),
              (6000, -56.5)]
BITE_EDGE = [(1500, -24), (2200, 4), (2800, 3.5), (3500, -5), (4300, -16.5), (6000, -26), (9000, -66)]
# teeth catching: (t/s, length/s, rise/s, then boom, crunch, crack and edge level/dB before layer gains);
# crack and edge last only a share of the length
BITES = [(2.542, .012, 0.003, -21, -26.5, -31, -38), (2.623, .02, 0.0087, -30, -33, -35.5, -39),
         (2.66, .044, 0.0066, -20, -24, -36, -40), (2.76, .019, .008, -19.5, -36.5, -39, -49.5),
         (2.799, .04, 0.0051, -22.5, -19.5, -19, -24), (2.922, .032, .002, -19.5, -24.5, -37.5, -40),
         (2.955, .04, 0.0091, -20, -35, -48, -53), (3.054, .0095, 0.0017, -30, -33, -38.5, -39),
         (3.116, .021, .008, -29, -42.5, -58, -49), (3.24, .012, .0012, -23.5, -30, -37, -40.5),
         (3.256, .035, .008, -15.5, -34.5, -35, -50), (3.521, .028, .002, -17, -31.5, -32.5, -42),
         (3.577, .02, .003, -12, -27.5, -26, -36), (3.621, .02, .005, -23, -29, -33, -30),
         (3.646, .026, .006, -19, -27.5, -32.5, -46), (3.752, .02, 0.0066, -21.5, -25, -48, -53),
         (3.783, .04, 0.0072, -20.5, -31.5, -47, -51), (3.94, .037, 0.0073, -26.5, -33.5, -33.5, -37.5),
         (4.038, .051, .003, -18.5, -28.5, -32.5, -39.5), (4.103, .02, .008, -22, -22, -29.5, -39),
         (4.138, .045, .008, -34.5, -24.5, -34, -42), (4.205, .03, .008, -21, -30, -42.5, -56),
         (4.246, .012, 0.0025, -28.5, -29, -41, -47), (4.289, .019, 0.0027, -37, -26, -32.5, -34.5),
         (4.316, .025, 0.0072, -32, -33, -47.5, -54), (4.482, .022, 0.0056, -38, -43.5, -38.5, -36.5),
         (4.499, .018, 0.004, -21, -26, -43, -43), (4.53, .02, 0.0069, -29, -28, -39.5, -46),
         (4.634, .06, 0.02, -31.5, -33, -43, -49), (5.173, .044, 0.0038, -21.5, -29, -37, -44),
         (5.233, .11, .01, -30, -36.5, -48, -50.5), (5.32, .078, 0.0091, -32, -38.5, -44.5, -48),
         (5.397, .04, 0.0094, -28.5, -39, -42, -45.5)]


def biting(steel, strike_db=5, crack_share=0.74, crack_db=-1, edge_db=-5):
    """Impact and modal response: a tooth strikes; the barrel booms and groans under coarse to fine breaks."""
    s, length, rise, boom, crunch, crack, edge = np.transpose(BITES)
    short = crack_share * length
    judder = amp(JUDDER_DB * drift(60))
    booming = bursts(zip(s, length, boom), rise + BOOM_LAG_S, BITE_T60_S)
    crunching = bursts(zip(s, length, crunch), rise, BITE_T60_S) * judder
    cracking = bursts(zip(s, short, crack + crack_db), rise, CRACK_T60_S) * judder
    edging = bursts(zip(s, short, edge + edge_db), rise, CRACK_T60_S) * judder
    # (strength, spectrum, breaks per second)
    layers = [(booming, BITE_BOOM, 1500), (crunching, BITE_CRUNCH, 1800),
              (cracking, BITE_CRACK, 1200), (edging, BITE_EDGE, 1200)]
    blow = steel * causal(BITE_CRUNCH)
    struck = irfft(rfft(strikes()) * blow, N) / abs(irfft(blow)).max()
    out = (groans() + amp(strike_db) * struck) * amp([[-3], [2]])  # left, right
    for strength, tone, per_s in layers:
        breaks = fractures(per_s, spread_db=3.0)
        out = out + strength * pair(breaks, steel * amp(read(tone)), BITE_BALANCE)
    return out


def scene():
    """Superposition: the three stretches follow one another, with the short events laid over them."""
    steel = barrel()
    drive = (labouring_exhaust() + drive_hum()) * amp([[-1.6], [1.2]])  # left, right
    first = (drive + squeal() + grinding(steel)) * during(GRINDING)
    second = (slow_exhaust() + dragging(steel) + biting(steel)) * during(BITING)
    last = beside() * during(BESIDE)
    return first + second + last + grit() + gravel() + rasps() + squeaks() + clicks()


def record(dry, edge_hz=14750):
    """Soft saturation and band limiting: peaks round off just under full scale, then a low-pass."""
    held = dry / (1 + abs(dry) ** 8) ** (1 / 8)
    low_pass = signal.firwin(511, edge_hz, window=("kaiser", 9), fs=SR)
    return signal.oaconvolve(held, low_pass[None], "same")


dry = scene()
out = record(dry)
file_out(out)
```